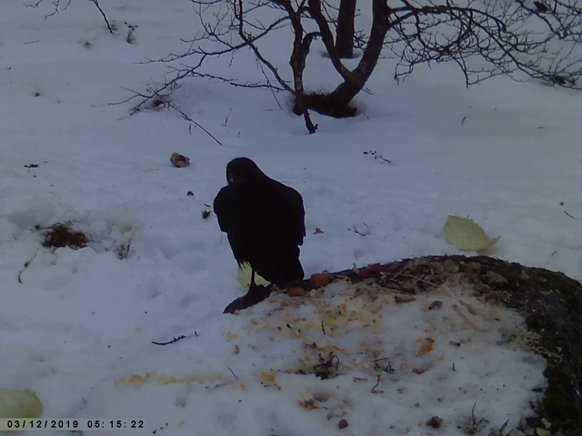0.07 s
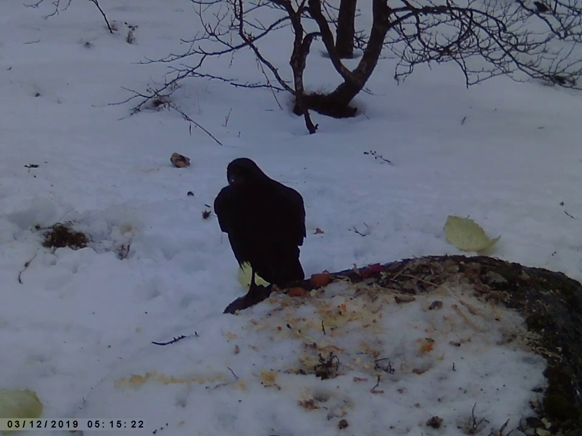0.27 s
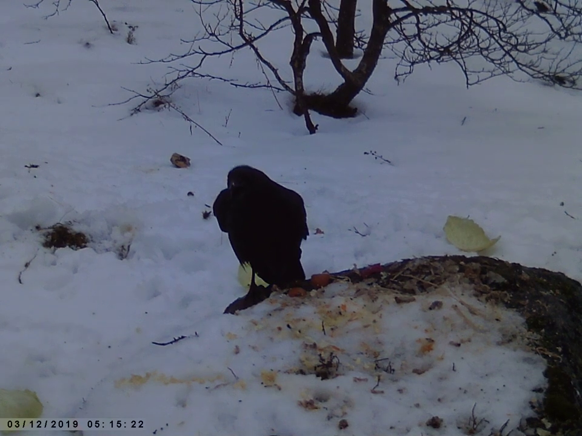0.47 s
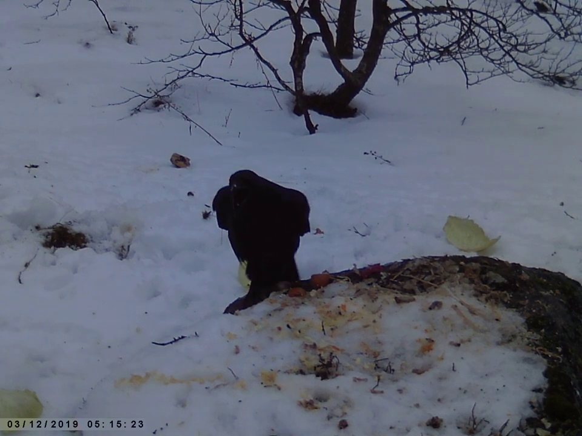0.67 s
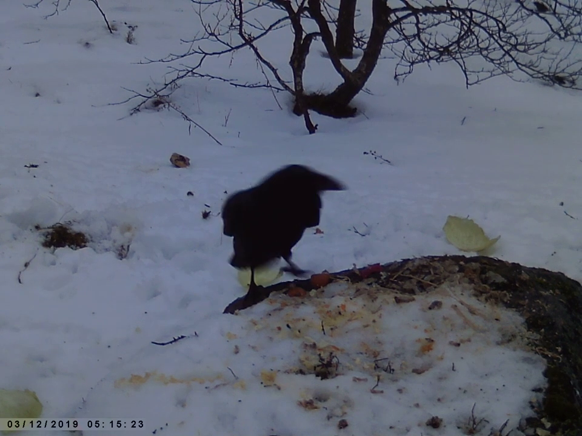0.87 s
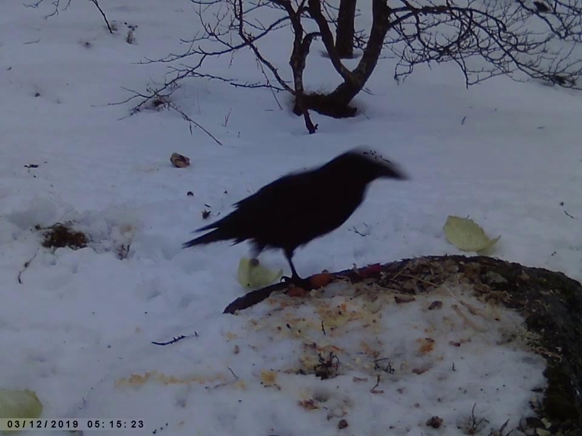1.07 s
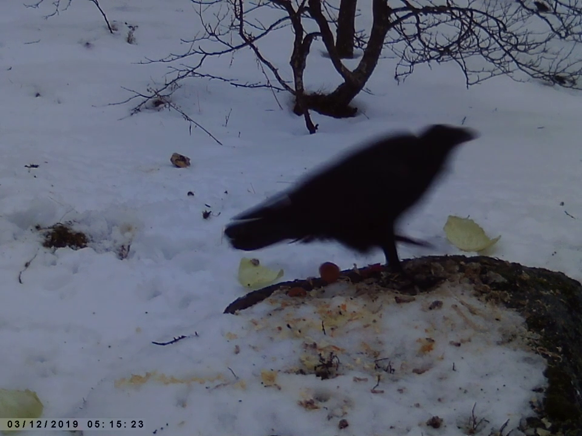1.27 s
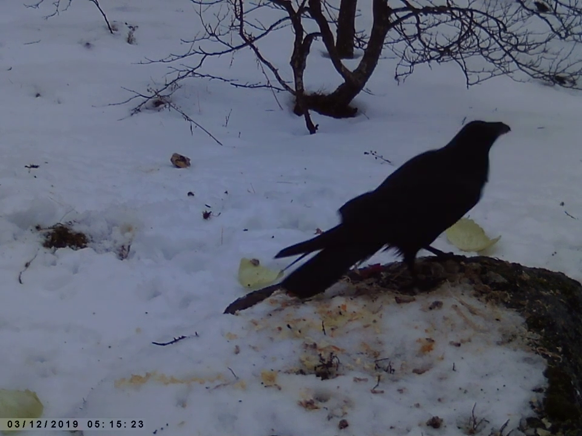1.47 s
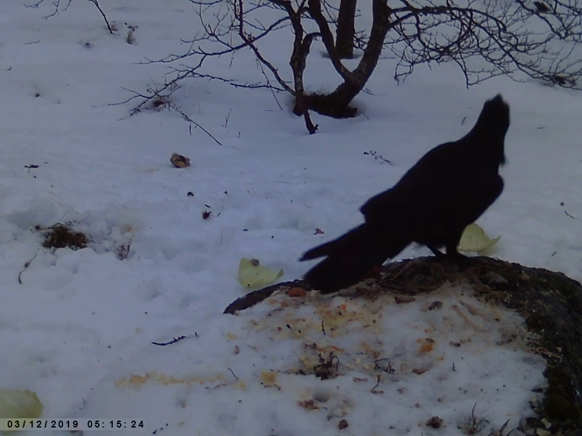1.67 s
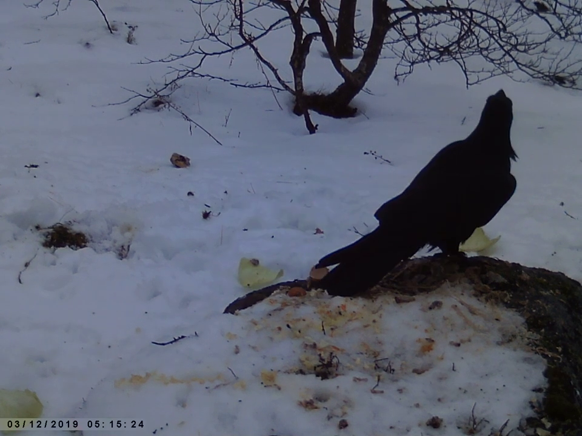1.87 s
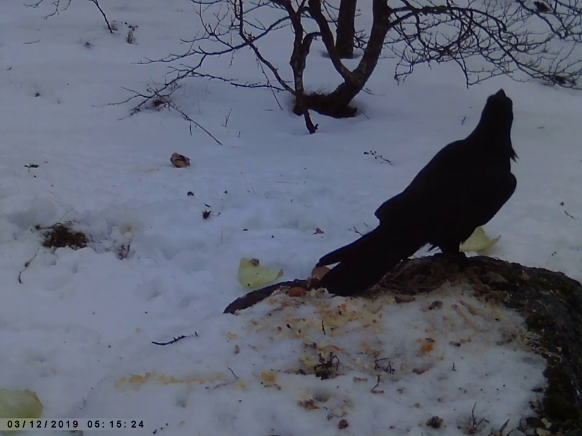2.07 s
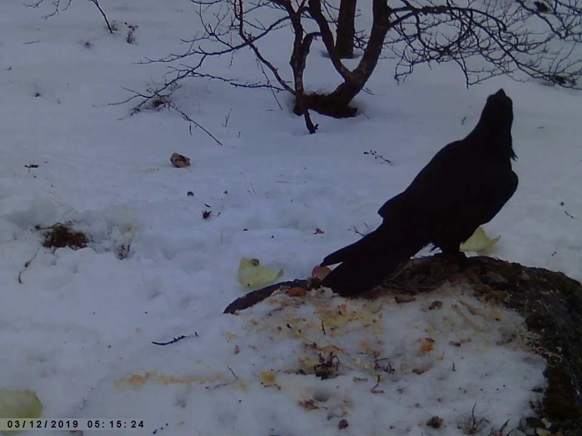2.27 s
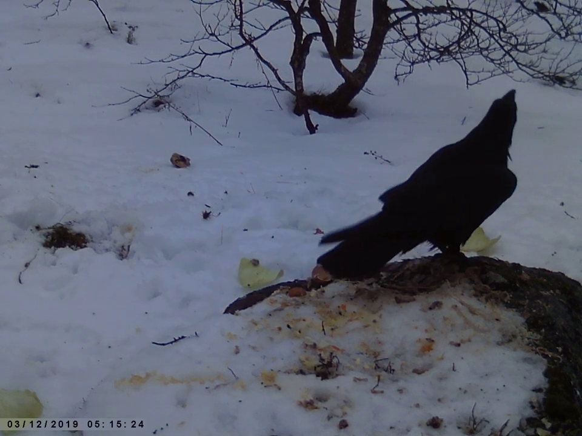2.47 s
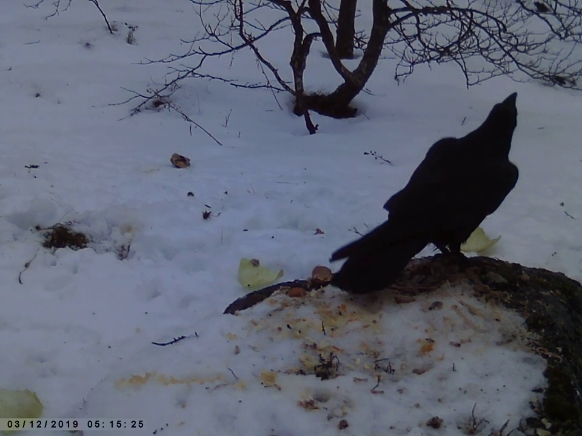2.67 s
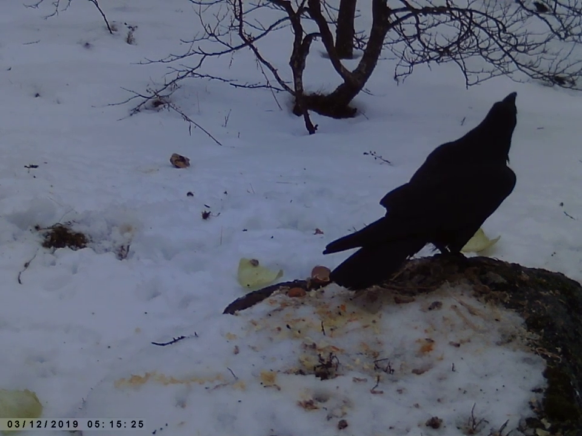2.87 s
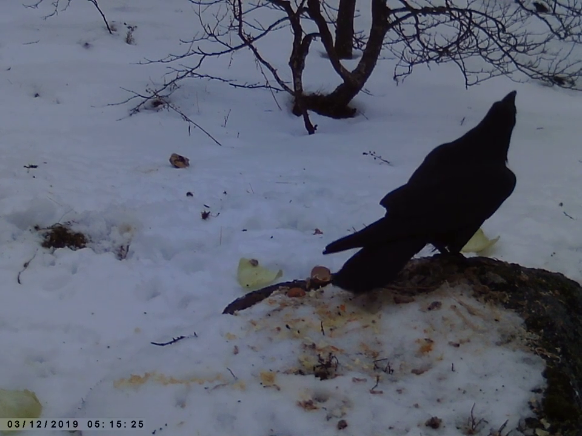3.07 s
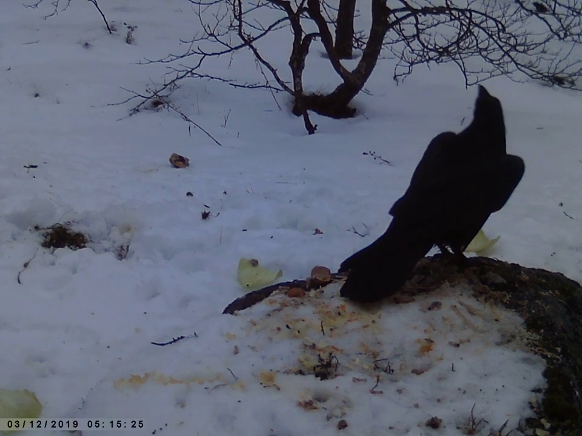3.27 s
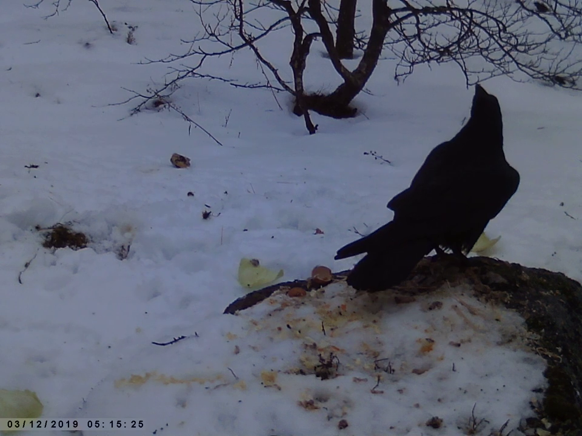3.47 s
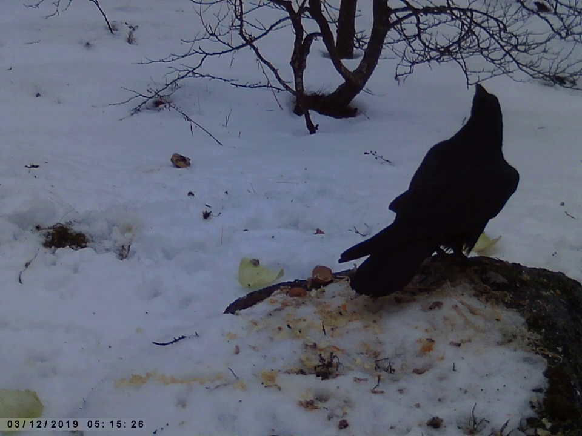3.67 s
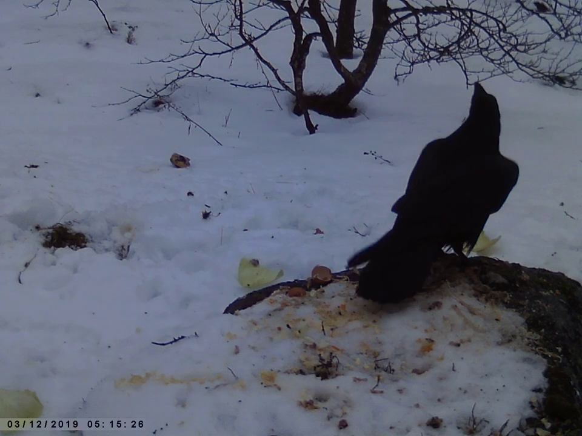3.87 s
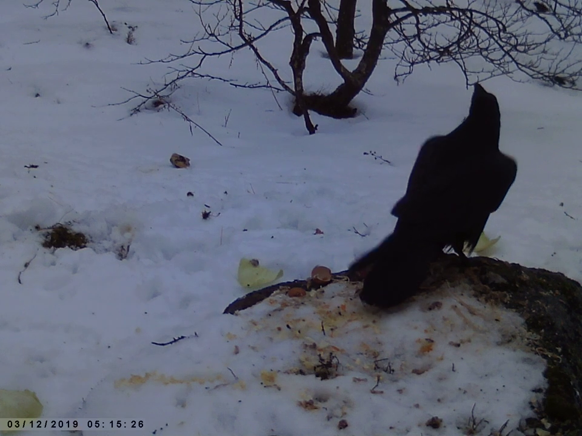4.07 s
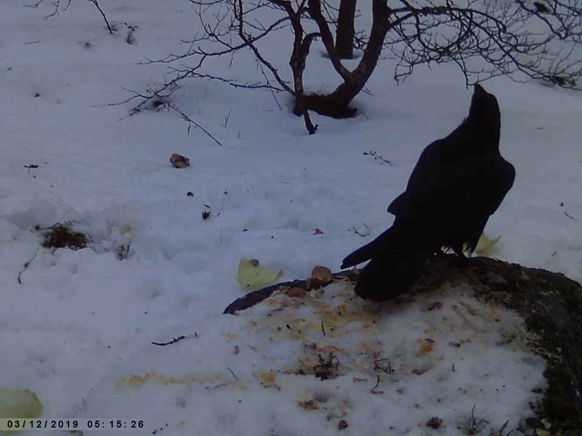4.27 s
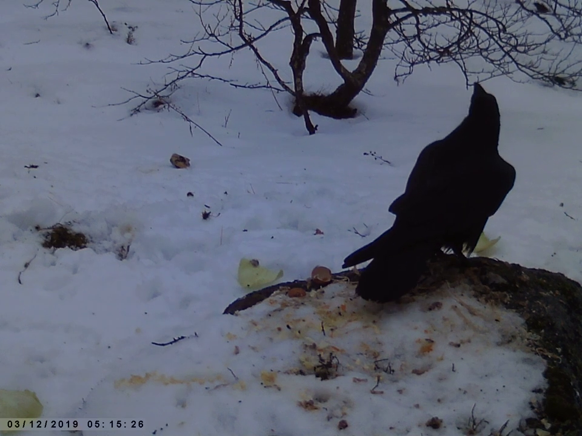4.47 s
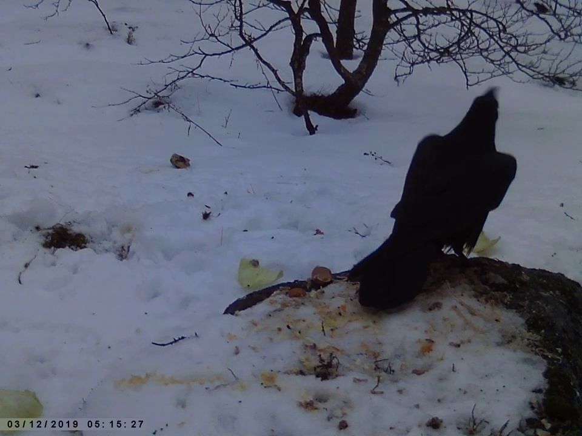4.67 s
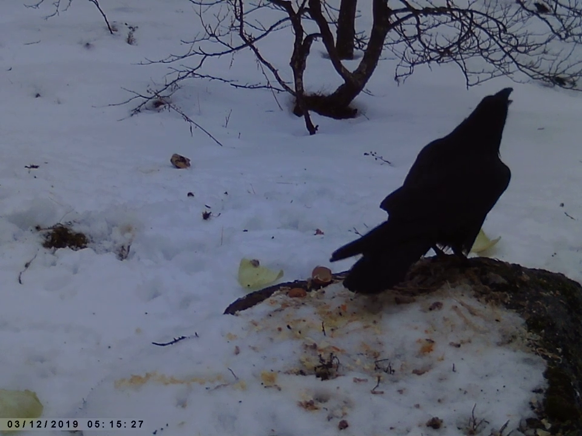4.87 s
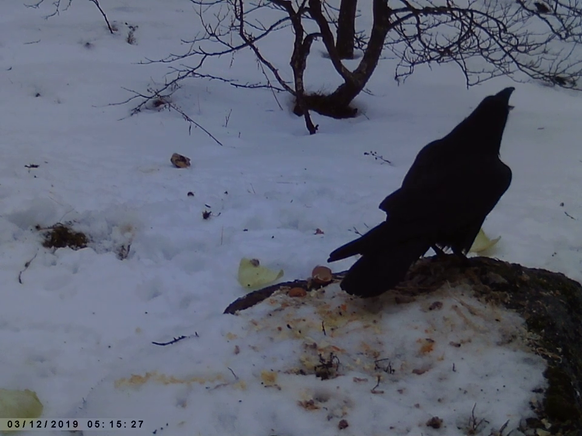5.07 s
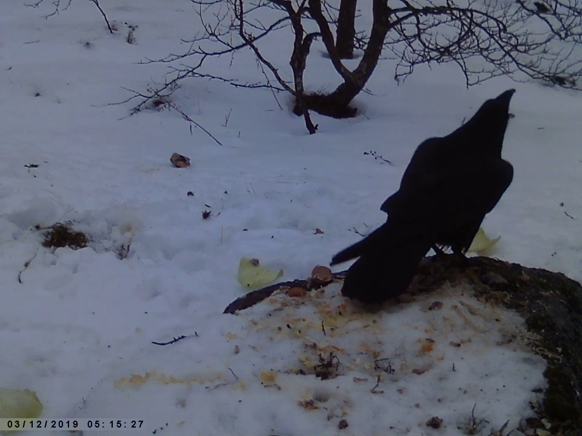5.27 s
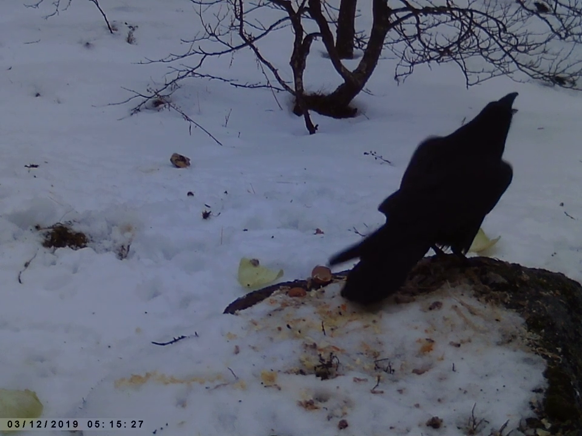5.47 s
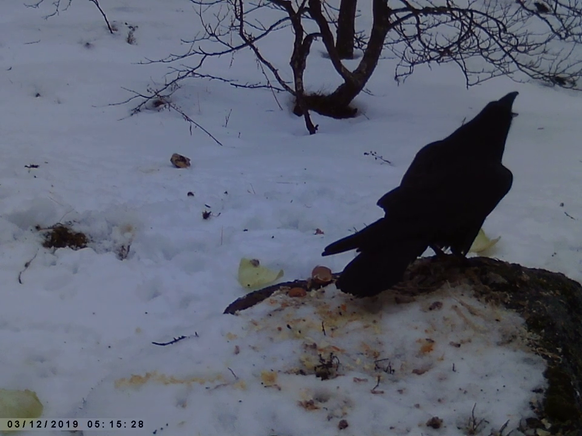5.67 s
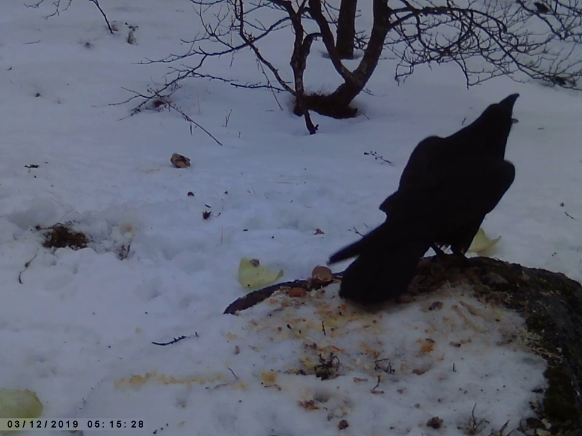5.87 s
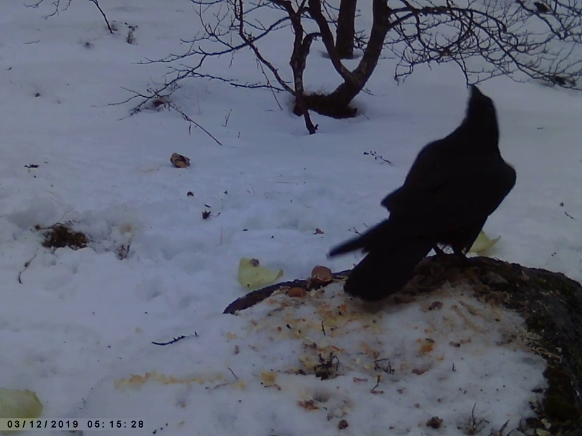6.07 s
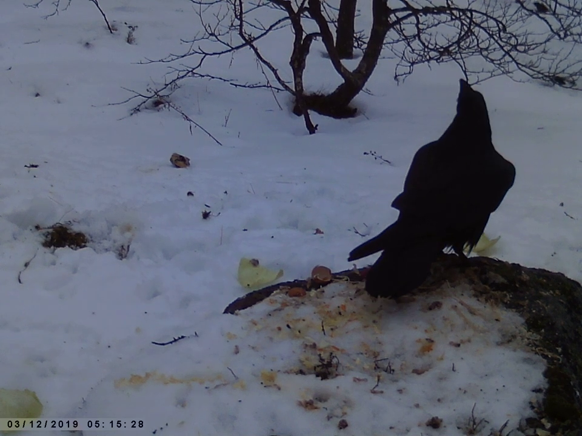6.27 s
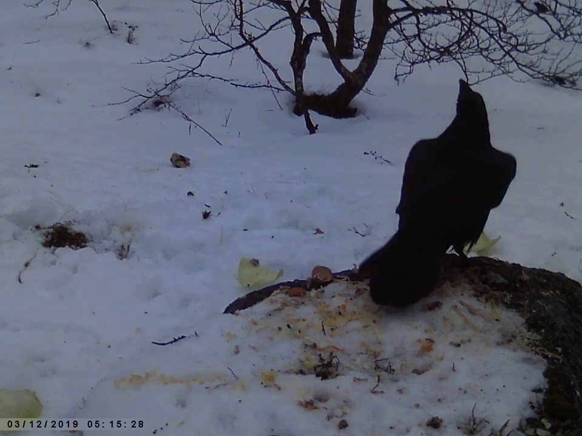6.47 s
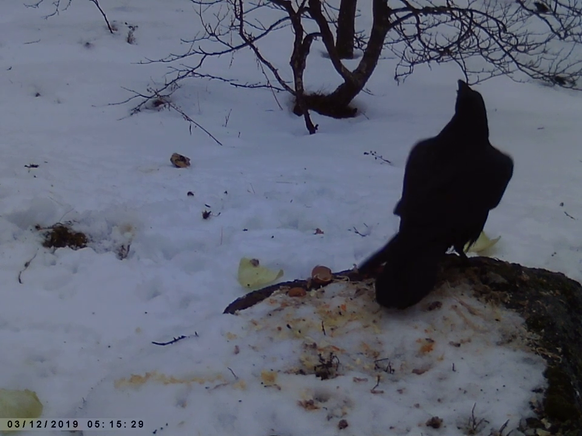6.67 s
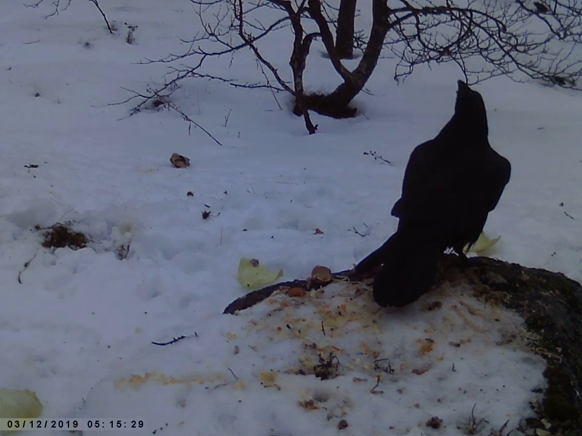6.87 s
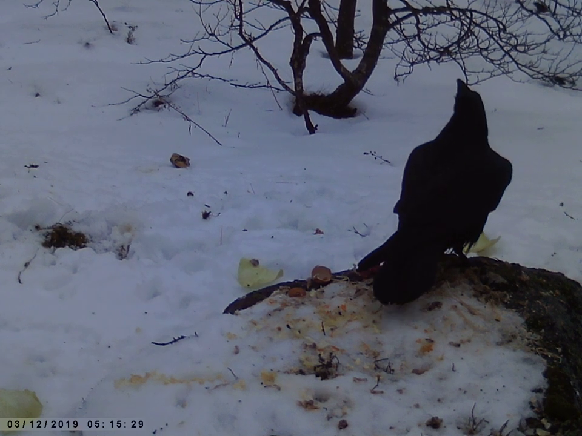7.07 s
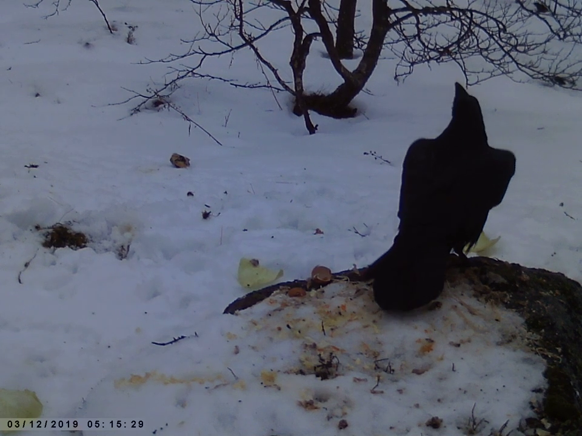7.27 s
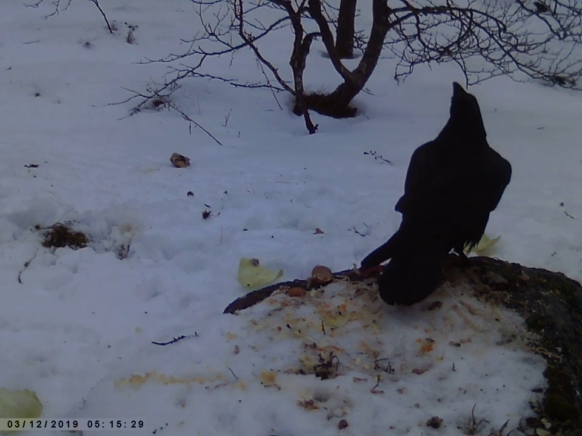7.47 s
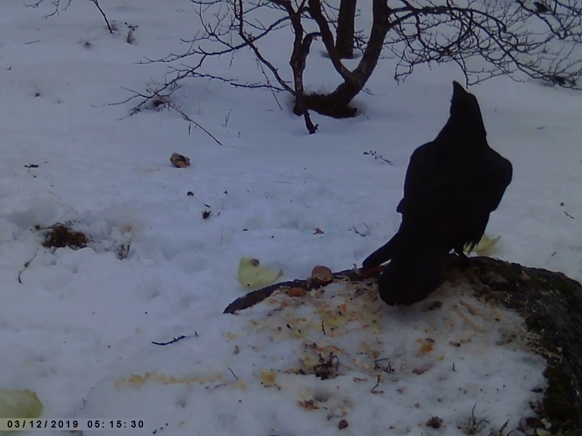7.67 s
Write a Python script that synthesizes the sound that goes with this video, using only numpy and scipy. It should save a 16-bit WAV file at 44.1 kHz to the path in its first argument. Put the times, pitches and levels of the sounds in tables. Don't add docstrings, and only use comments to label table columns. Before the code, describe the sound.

Close outdoor microphone in snowy woods. Wind thumps and flutters low, then a raven facing the microphone barks one very loud, clipped croak. Brittle claw crunches follow as it hops on crusted snow. After a pause it turns away and repeats eight shorter-sounding, softer, rattling croaks roughly every 0.6 seconds, with a faint tail among trees. Another raven answers faintly far off. Soft hiss continues, and wind strengthens again at the end.

```python
import sys
import numpy as np
from scipy import signal
from scipy.fft import rfft, irfft, next_fast_len
from scipy.io import wavfile
from scipy.ndimage import uniform_filter1d, map_coordinates

SR = 44100
rng = np.random.default_rng(int(sys.argv[2]) if len(sys.argv) > 2 else 0)


def log_audio(samples):
    frames = np.atleast_2d(samples).T
    limited = np.clip(frames, -1, 1)
    pcm = np.round(limited * 32767).astype(np.int16)
    wavfile.write(sys.argv[1], SR, pcm)


def elevation(decibels):
    levels = np.asarray(decibels, float)
    return 10 ** (levels / 20)


N = 340893

# first_slap_s, steady_flap_period_s, closing_slide_s, top_pitch_hz, effort_db
CROAK_CALLS = [
    (0.621, .0230, .020, 599.4, 1),
    (2.608, .0230, .030, 592.5, 0.5),
    (3.159, .0236, 0.03, 592.6, 0.5),
    (3.883, 0.02404, 0.023, 591.8, 0),
    (4.604, .0244, .029, 592.4, 0),
    (5.257, .0248, .032, 590.9, -1),
    (5.838, .0246, .028, 583.8, -1),
    (6.443, .0250, 0.03, 590.7, -0.91),
    (7.196, .0248, 0.034, 586.9, -1.5),
]
FLAP_PITCH = [(0, .77), (.08, .83), (.17, .92), (.3, .945), (.52, .97), (.67, 1.01), (.79, 1.001),
              (.89, .9), (1, .77)]
STAGE_FLAPS = [-1, 0, 2, 3, 5, 9, 10, 10, 10]
STAGE_PITCH = [0.94, .84, .92, .97, 1.001, .995, .955, .655, 0.45]
STAGE_LEVEL = [-58.5, -21.5, -10.5, -12, -13, -15.5, -16, -22, -47.5]
STAGE_FADE = [8.6, 13, 18, 7.5, 7.5, 0.42, 0.5, .1, .1]
STAGE_SHUT = [7, 21, 11, 1.9, .1, .1, .1, 0.11, 0.09]
# pitch_hz, level_db
CHEST_TONE = [(230, -36.5), (300, -41.5), (480, -37.5), (540, -36.5), (610, -28.5)]
# frequency_hz, level_db
WINDPIPE_TONE = [(600, -46), (800, -37.5), (930, -36.5), (1000, -30.5), (1080, -22.5), (1140, -15),
                 (1210, -15.5)]
# centre_hz, width_hz, level_db
BEAK_RINGING = [(2702, 850, -6), (3987, 72, 4), (4562, 240, 1.5), (5131, 280, 9.5)]
# frequency_hz, level_db
HEAD_AWAY = [(700, -40.5), (1100, -20.5), (1450, -19), (1750, -26), (2150, -40), (2480, -30.5), (2900, -36),
             (3150, -40), (3750, -32.5), (4250, -33.5), (4650, -42), (5300, -44), (7000, -62),
             (14000, -91.5)]
# frequency_hz, level_db
HEAD_FACING = [(700, -19.5), (1000, -20.5), (1450, -23), (1780, -21), (2150, -33), (2500, -30), (3100, -34),
               (3700, -22), (4600, -22.5), (5400, -19.5), (6300, -34), (7500, -42.5), (10000, -48),
               (15000, -58)]
# frequency_hz, level_db
RADIATED_AROUND = [(300, -13), (1200, -3.5), (2500, 2.5), (5000, 13.5), (7000, 17), (15000, -7)]
# frequency_hz, level_db
CRUST_SCATTER = [(1200, -31), (2500, -3), (4000, -6.5)]
# frequency_hz, t60_s
MOUND_DECAY = [(500, .03), (2500, .045), (6000, .055), (12000, .04)]
# frequency_hz, t60_s
TREE_DECAY = [(300, 0.878), (1200, 0.731), (2500, 0.44), (5000, 0.49), (9000, 0.49)]
# start_s, peak_db, low_crunch_db
CLAW_STEPS = [(1.0076, -48, -7), (1.0198, -39, -14.5), (1.0794, -54, -6), (1.1177, -32.5, -20.5),
              (1.1396, -37, -22), (1.2009, -31.5, -10), (1.2068, -38.5, -8.5), (1.2679, -36.5, -10),
              (1.2769, -23.5, -14.5), (1.2931, -31.5, -15), (1.301, -45.5, -4), (1.3524, -59.5, -10),
              (1.3755, -50, -10.5), (1.3881, -40, -17.5), (1.4918, -41.5, -27.5), (1.5134, -48.5, -12.5),
              (1.6481, -39.5, -23.5), (1.7737, -33, -28.5), (1.808, -50, -5.5)]
# start_s, length_s, level_db
SNOW_SHUFFLE = [
    (0.454, 0.18, -72),
    (1.285, 0.25, -68),
]
# start_s, length_s, level_db
FAR_CALLS = [
    (2.939, .13, -61.5),
    (6.712, .11, -52),
]
# time_s, strength_db, port_flutter_over_strength_db
WIND_COURSE = [(0, -32, -8.5), (.25, -32, -2), (.58, -24.5, -3), (.85, -24.5, -8), (1.1, -29, -11),
               (1.35, -41.5, -18), (1.9, -38.5, -18.5), (2.2, -51, -24), (2.4, -60.5, -14.5),
               (2.98, -37.5, -9.5), (3.7, -52.5, -19.5), (4.25, -47.5, -13.5), (5.1, -48, -15),
               (5.6, -43, -11.5), (5.8, -32.5, -8.5), (6.4, -33, -10.5), (7.1, -29.5, -2.5),
               (7.73, -21.5, -4.5)]
# time_s, buffet_over_strength_db, flutter_change_db
WIND_GUSTS = [(.08, -11, -5), (.13, 2.5, -2), (.23, 8, 3), (.84, 3.5, 2.5), (1.29, 7.5, 3.5),
              (1.46, 8.5, 2), (1.74, 3.5, -4), (1.96, 12, 1.5), (2.2, 16, 18.5), (2.5, 10, -2),
              (2.69, 11, 8), (2.82, -8, -6.5), (3.08, -13, -8), (3.33, 2, 6.5), (3.59, 11.5, 10.5),
              (3.77, -4, -7), (4.0, 8.5, 7), (4.22, 12, 0.5), (4.41, 8, 3), (4.49, -19, -14),
              (4.72, 5.5, 5), (4.97, 11, 13), (5.25, 12.5, 16.5), (5.399, 12, 10.5), (5.51, -23, -7.5),
              (6.31, 12, 5), (6.39, 5.5, 8.5), (6.52, 8, -2), (6.76, 9.5, 5.5), (6.98, 3, -11)]
# time_s, peak_db
WIND_PUFFS = [(0.185, -37.5), (0.212, -23.5), (0.227, -25), (0.258, -28), (0.299, -33), (0.354, -30),
              (0.374, -34.5), (0.404, -33), (0.475, -21.5), (0.501, -24.5), (0.527, -18), (0.565, -24),
              (0.589, -21.5), (0.873, -19), (0.928, -31), (5.736, -38.5), (6.177, -24), (6.254, -33.5),
              (6.354, -47.5), (6.743, -24.5), (6.786, -37), (6.882, -32.5), (6.989, -51.5), (7.056, -30.5),
              (7.081, -25.5), (7.522, -25.5), (7.632, -29), (7.665, -30.5), (7.684, -27)]
# frequency_hz, density_db_per_hz
BUFFET_SPECTRUM = [(8, -33.5), (15, -6.5), (50, 0.5), (100, -6), (160, -21), (260, -50), (500, -88.5)]
# frequency_hz, density_db_per_hz
PORT_SPECTRUM = [(40, -38), (110, 0.68), (240, -10.5), (500, -27), (1000, -46.5), (2000, -73.5)]
# frequency_hz, level_db
EDDY_SPECTRUM = [(30, -31), (110, 1.83), (300, -9.5), (600, -24.5), (1200, -39.5), (2500, -72)]
# frequency_hz, density_db_per_hz
HISS_SPECTRUM = [(120, -29.5), (200, -2.5), (812, -8.5), (923, -8.5), (1030, -11.5), (7830, -20),
                 (13900, -18.5), (15500, -31.5), (16400, -44)]

BREATH_IN_S, THIRD_FLAP_S, DIE_S = .024, .015, .015
QUICK, SLOWING = .605, .82
SLAP_TIRES_DB_PER_S, SAG_PER_S = 0.04, .004
TURN_DB_PER_S = 0.6478
GUST_S = 0.039
HISS_DB = -64
TOP_HZ = 15800


def raven():
    sound = np.zeros(N + 2 * SR)
    for k, call in enumerate(CROAK_CALLS):
        turned = k > 0
        rows = stages(*call)
        chest, pipe, pulses = croak(rows, jitter=.007, breath_db=14.5, lead_db=-30, open_db=0 if turned else 11)
        ring = filtered(pulses, resonances(BEAK_RINGING))
        turn_db = TURN_DB_PER_S * max(call[0] - 4, 0)
        away = chest + elevation(turn_db) * pipe + elevation(-4.0) * causal(pulses + ring, HEAD_AWAY)
        if turned:
            direct = away
            near = elevation(-12.0) * coloured(away, RADIATED_AROUND)
        else:
            facing = pulses + elevation(-7) * ring
            direct = elevation(5.5) * chest + elevation(-2.5) * pipe + elevation(-1.5) * causal(facing, HEAD_FACING)
            near = elevation(-12) * direct
        heard = sound[round(rows[0][0] * SR):][:len(direct)]
        heard += direct + scattered(coloured(near, CRUST_SCATTER), MOUND_DECAY, gap=39.74)
        trees = scattered(coloured(away, RADIATED_AROUND), TREE_DECAY, gap=630)
        heard += elevation(-25 if turned else -28) * trees
    return sound[:N]


def stages(slap_s, flap_s, slide_s, top_hz, effort_db):
    steps = [-BREATH_IN_S, BREATH_IN_S, 2 * QUICK * flap_s, THIRD_FLAP_S, 2 * SLOWING * flap_s]
    steady = np.diff(STAGE_FLAPS)[4:6] * flap_s
    times = slap_s + np.cumsum(np.r_[steps, steady, slide_s, DIE_S])
    third_slap, last_flaps = np.equal(STAGE_FLAPS, 2), np.greater(STAGE_FLAPS, 5)
    tired_s = slap_s - N / SR / 2
    pitch_hz = top_hz * np.array(STAGE_PITCH) * (1 - SAG_PER_S * tired_s * last_flaps)
    level_db = effort_db + np.array(STAGE_LEVEL) - SLAP_TIRES_DB_PER_S * tired_s * third_slap
    return np.c_[times, pitch_hz, level_db]


def croak(rows, jitter, breath_db, lead_db, open_db):
    span = slice(round(rows[0][0] * SR), round(rows[-1][0] * SR) + 300)
    columns = curves(np.c_[rows, STAGE_FLAPS, STAGE_FADE, STAGE_SHUT])
    top_hz, level_db, flaps, fade_db, shut_db = [c[span] for c in columns]
    t, share = np.arange(N)[span] / SR, flaps % 1

    def bump(s, width):
        return np.exp(-((t - s) / width) ** 2)

    def lagging(level):
        return uniform_filter1d(level, size=110, origin=40)

    rebound = 1 + 0.17 * bump(rows[6][0] + 0.008, .009)
    flap_pitch = np.interp(share, *np.transpose(FLAP_PITCH))
    hz = top_hz * flap_pitch * rebound * (1 + jitter * wobble(500)[span])
    cycles = np.cumsum(hz) / SR
    cycles -= cycles[np.argmax(flaps >= 0)] % 1 + 0.37
    effort = np.sqrt(2) * elevation(level_db + 17 - np.maximum(fade_db, 0) * share)
    effort = effort * signal.windows.tukey(len(t), .05)

    orders = np.arange(3, 40)[:, None]
    mouth = .4 * (np.abs(orders * hz - 2700) < 300) * (flaps >= 0)
    mouth = mouth - (orders == 3) - .4 * (np.abs(orders * hz - 1950) < 250)
    closing_db = 6 * bump(rows[7][0] - .012, 0.0077) * (np.abs(orders * hz - 2550) < 350)
    harmonics = np.cos(2 * np.pi * orders * cycles) * (orders * hz < 16000)
    train = np.sum(harmonics * elevation(shut_db * mouth + closing_db), axis=0)

    air = np.cos(np.pi * cycles) ** 4 * np.diff(rng.standard_normal(len(t) + 1))
    lead = np.sin(2 * np.pi * 1090 * t + .7 * wobble(300)[span])
    lead = elevation(lead_db) * bump(rows[1][0] - .006, .003) * lead

    chest, pipe, pulses = np.zeros((3, 3 * SR // 2))
    chest[:len(t)] = lagging(effort * elevation(along(CHEST_TONE, hz))) * np.cos(2 * np.pi * cycles)
    beak_db = open_db * np.clip((1080 - 2 * hz) / 200, 0, 1)
    pipe_db = along(WINDPIPE_TONE, 2 * hz) + .2 * shut_db + beak_db
    pipe[:len(t)] = lagging(effort * elevation(pipe_db)) * np.cos(4 * np.pi * cycles - 1.5) + lead
    pulses[:len(t)] = effort * (train * elevation(.6 * wobble(400)[span]) + elevation(breath_db) * air)

    slaps = np.zeros(len(pipe))
    slap_source = train + np.cos(6 * np.pi * cycles) + elevation(6) * air
    slaps[:len(t)] = effort * slap_source * np.clip(3 - flaps, 0, 1)
    pipe += elevation(-17.5) * rung_twice(slaps, 1120, 260, .1)
    return chest, pipe, pulses


def causal(x, spectrum):
    cepstrum = irfft(along(spectrum, np.fft.rfftfreq(4096, 1 / SR)) * np.log(10) / 20)
    cepstrum *= np.r_[1, np.full(2047, 2), 1, np.zeros(2047)]
    return signal.fftconvolve(x, irfft(np.exp(rfft(cepstrum))))[:len(x)]


def scattered(x, decays, gap):
    hz, t, z = signal.stft(rng.standard_normal(SR), SR, nperseg=256)
    decay = elevation(-60 * t / along(decays, hz)[:, None])
    tail = signal.istft(z * decay, SR, nperseg=256)[1]
    return signal.fftconvolve(np.pad(x, (round(gap), 0)), tail / np.linalg.norm(tail))[:len(x)]


def hops():
    high, low, t = np.zeros(N), np.zeros(N), np.arange(900) / SR
    for s, db, low_db in CLAW_STEPS:
        burst = elevation(db - 60 * t / 0.025) * rng.standard_normal((2, len(t)))
        high[round(s * SR):][:len(t)] += burst[0]
        low[round(s * SR):][:len(t)] += elevation(low_db) * burst[1]
    for row in SNOW_SHUFFLE:
        gain = held(*row, attack_s=.03, release_s=.04) * elevation(10.0 + 4 * wobble(150))
        high += gain * rng.standard_normal(N)
    crackle = elevation(-1.5) * rung_twice(high, 5100, 2400, 0.1)
    crunch = elevation(10.5) * rung_twice(low, 2674, 1300, 0.085)
    return crackle + crunch


def far_raven():
    sound = np.zeros(N)
    throb = elevation(3 * np.sin(2 * np.pi * 42 * np.arange(N) / SR))
    for row in FAR_CALLS:
        sound += held(*row, attack_s=.03, release_s=0.095) * throb * rng.standard_normal(N)
    return elevation(16) * rung_twice(sound, 930, 380, 0.1)


def wind():
    strength_db, port_db = curves(WIND_COURSE)
    t = np.arange(N) / SR
    swell_db, flutter_db = sum(np.outer(db, np.exp(-((t - s) / GUST_S) ** 2)) for s, *db in WIND_GUSTS)
    lumps = elevation(1.5 * wobble(14))
    buffet = unit(lumps * coloured(rng.standard_normal(N), BUFFET_SPECTRUM))
    grains = rng.standard_normal(N) * (rng.random(N) < 160 / SR) * elevation(3 * rng.standard_normal(N))
    port = unit(coloured(unit(grains) + .5 * rng.standard_normal(N), PORT_SPECTRUM))
    kicks = np.zeros(N)
    for s, db in WIND_PUFFS:
        kicks[round((s + .003) * SR)] = elevation(db + 45.0) * rng.choice([-1, 1])
    buffet_gain = elevation(strength_db + swell_db + 0.5 * wobble(6.4))
    port_gain = elevation(strength_db + port_db + flutter_db + 2.5 * wobble(12))
    return buffet_gain * buffet + port_gain * port + coloured(kicks, EDDY_SPECTRUM)


def preamplifier_hiss():
    return elevation(HISS_DB) * unit(coloured(rng.standard_normal(N), HISS_SPECTRUM))


def resonances(modes):
    def response(f):
        total = 0
        for k, (centre, width, db) in enumerate(modes):
            loss = 1j * f * width
            total = total + (-1) ** k * elevation(db) * loss / (centre * centre - f * f + loss)
        return total
    return response


def rung_twice(x, centre_hz, width_hz, db):
    return filtered(x, lambda f: resonances([(centre_hz, width_hz, db)])(f) ** 2)


def filtered(x, response):
    m = next_fast_len(len(x) + SR // 2)
    return irfft(rfft(x, m) * response(np.fft.rfftfreq(m, 1 / SR)), m)[:len(x)]


def coloured(x, spectrum):
    return filtered(x, lambda hz: elevation(along(spectrum, hz)))


def along(points, hz):
    f, v = np.transpose(points)
    return np.interp(np.log(hz + 1), np.log(f + 1), v)


def curves(rows):
    s, *cols = np.transpose(rows)
    return [np.interp(np.arange(N) / SR, s, c) for c in cols]


def held(s, length, db, attack_s, release_s):
    return elevation(curves([(s - attack_s, -99), (s, db), (s + length, db), (s + length + release_s, -99)])[0])


def wobble(rate):
    return map_coordinates(rng.standard_normal(int(N * rate / SR) + 4), [np.arange(N) * rate / SR])


def unit(x):
    return x / np.sqrt(np.mean(x ** 2) + 1e-20)


def scene():
    return (raven() + far_raven() + hops() + wind() + preamplifier_hiss())[None]


def low_pass(x):
    return signal.sosfilt(signal.butter(12, 16520, fs=SR, output="sos"), x)


def record(dry):
    squeezed = np.where(dry < 0, dry / (1 + (dry / .6) ** 4) ** (1 / 4), dry)
    clipped = np.minimum(squeezed, .72) * signal.windows.tukey(N, 400 / N)
    limited = filtered(clipped[0], lambda hz: hz < TOP_HZ)
    return low_pass(limited[None])


dry = scene()
out = record(dry)
log_audio(out)
```